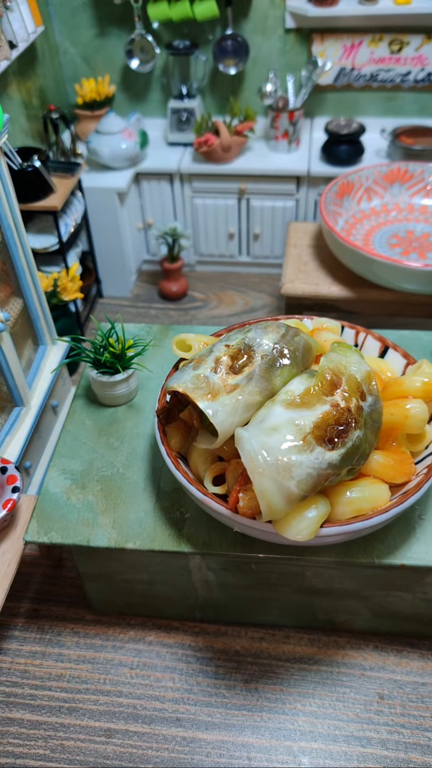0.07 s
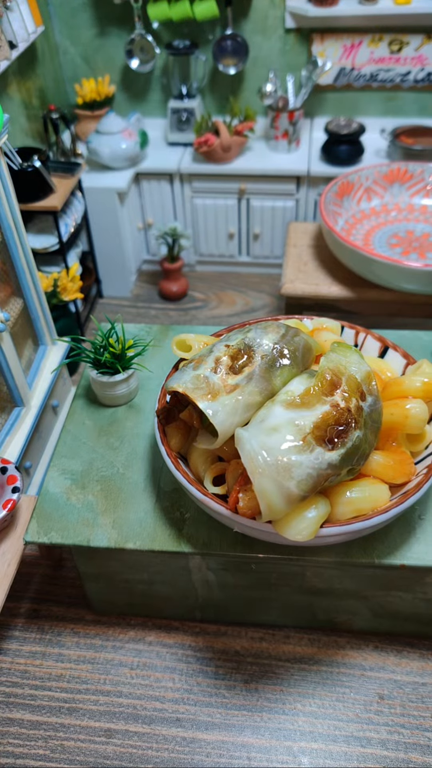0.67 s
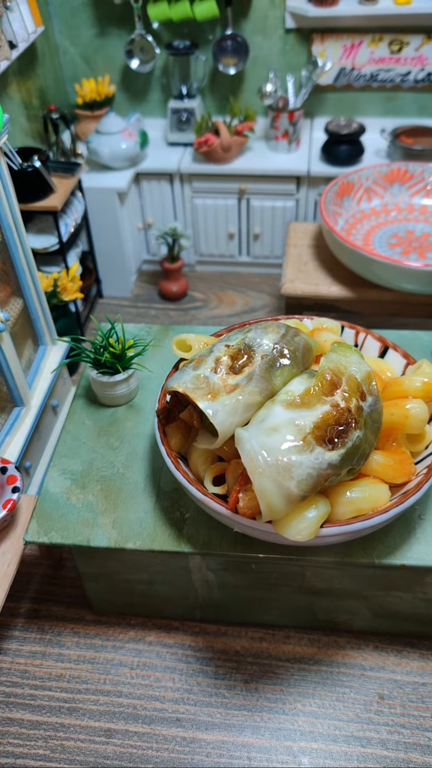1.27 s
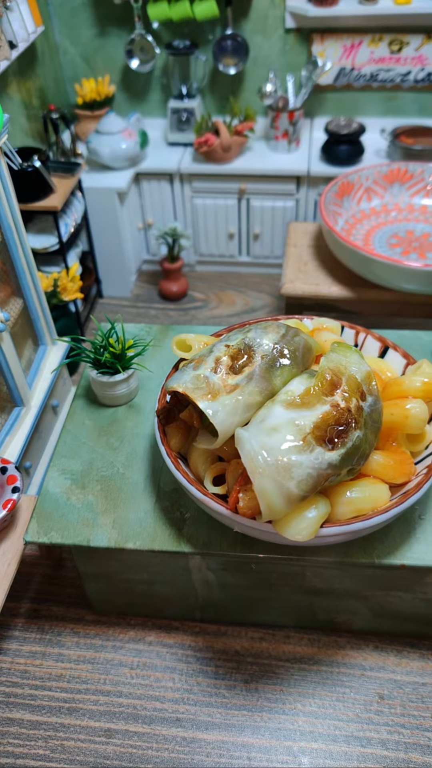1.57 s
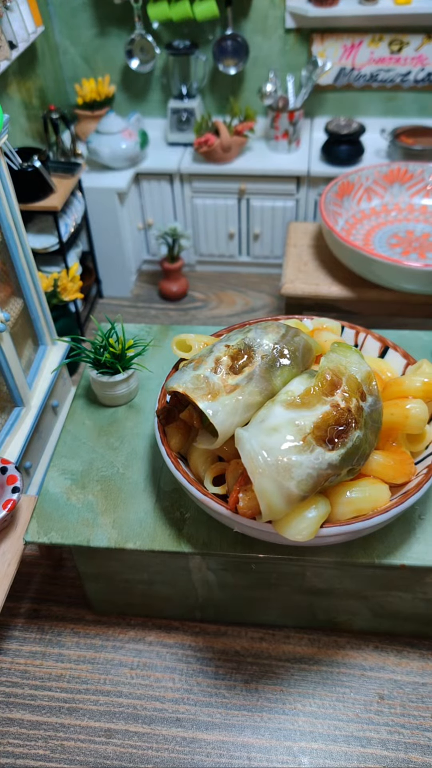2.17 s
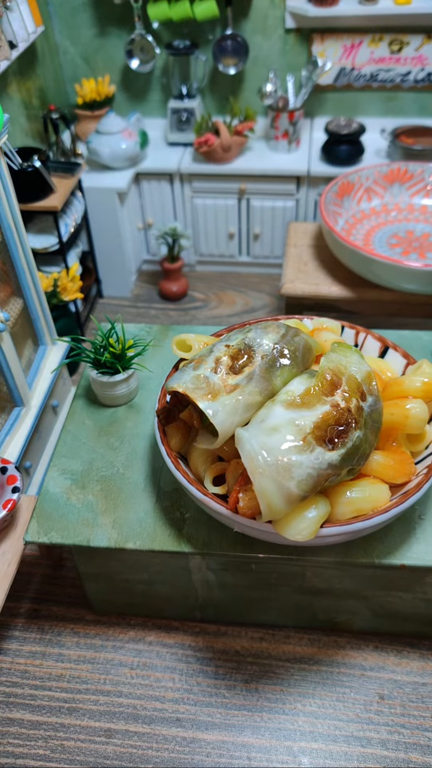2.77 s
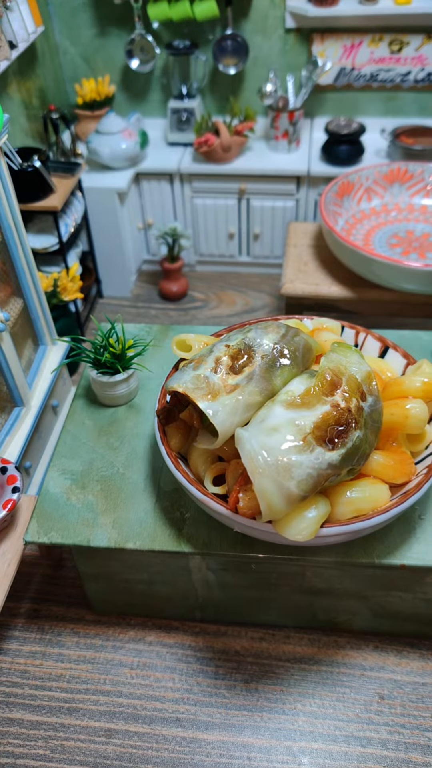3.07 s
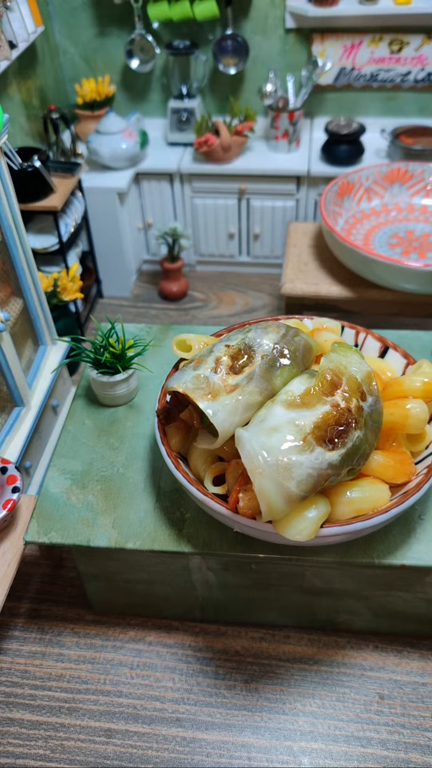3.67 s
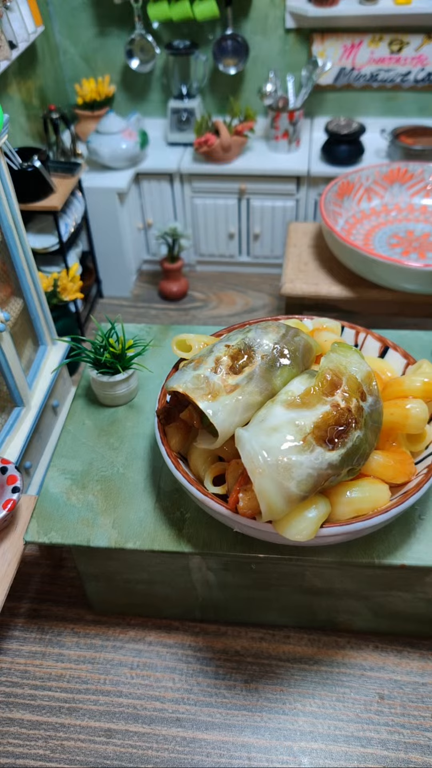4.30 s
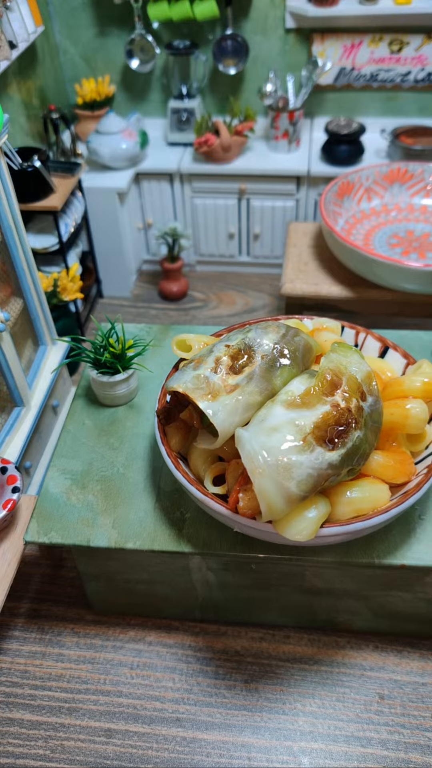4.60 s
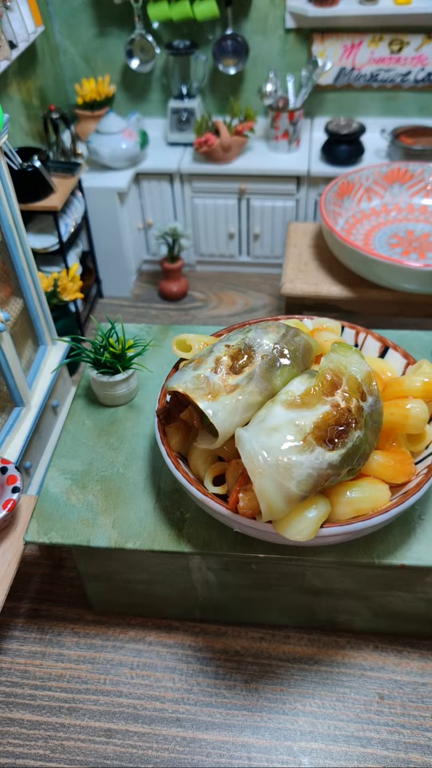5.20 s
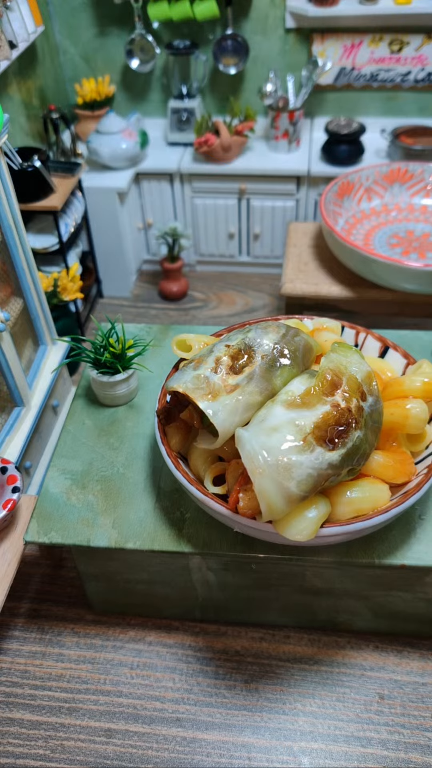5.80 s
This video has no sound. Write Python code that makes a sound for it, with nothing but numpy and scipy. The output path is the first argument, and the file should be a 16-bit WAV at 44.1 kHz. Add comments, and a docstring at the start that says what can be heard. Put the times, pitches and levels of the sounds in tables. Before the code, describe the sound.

A toothpick works sticky food with small wet clicks, tiny dishes tap, and food starts sizzling in a little pan.

```python
"""Miniature cooking on a table

Close by, a toothpick works sticky food with small wet clicks. Tiny dishes tap, ring and skid, and
hollow wooden furniture bumps softly. Halfway a hiss sets in, like food frying in a tiny pan: drops
of fat burst and ring the pan, then the hiss thins into crackles. The room hums low underneath."""
import sys
import numpy as np
from scipy import signal
from scipy.fft import rfft, irfft, next_fast_len
from scipy.io import wavfile
from scipy.ndimage import map_coordinates

SR = 44100
rng = np.random.default_rng(int(sys.argv[2]) if len(sys.argv) > 2 else 0)


def log_audio(samples):
    """Write samples as a 16-bit WAV file to the path given in sys.argv[1]."""
    # one column per channel
    frames = np.atleast_2d(samples).T
    # limit to full scale, then quantise
    limited = np.clip(frames, -1, 1)
    pcm = np.round(limited * 32767).astype(np.int16)
    wavfile.write(sys.argv[1], SR, pcm)


N = 257984
TIME = np.arange(N) / SR  # seconds into the scene
AGE = np.arange(SR // 5) / SR  # seconds into one short sound

# tone of wet food: (frequency [Hz], level [dB])
WET_TONE = [(300, -13), (950, -26), (1520, -3), (2000, -10), (2600, -3.5), (3200, -4), (3800, 4), (4400, 0),
            (5200, -7), (5800, 1.5), (6500, 5.5), (7500, 3.5), (8500, 5.5), (11000, 8), (16000, 8.5)]
# tone of the ringing pan, before tuning: (frequency [Hz], level [dB])
PAN_TONE = [(300, -30), (850, -28.5), (1250, -24), (1540, -8.5), (1980, -19), (2350, -11), (2600, -15.5),
            (2900, -9), (3350, -8), (3930, -1.5), (4500, -10.5), (5850, -7.5), (6350, 4), (6750, 2.5),
            (7120, 5.5), (7750, -10), (16000, -9)]
# the pan's pitch rises, then sinks: (time [s], pitch [ratio])
PAN_TUNING = [(3.1, 0.94), (3.6, 1.0), (4.55, 0.99), (5.1, 0.77)]


def amp(db):
    """Turn decibels into a gain."""
    return 10 ** (np.asarray(db) / 20)


def unit(x):
    """Scale to an average (rms) size of 1."""
    return x / np.sqrt(np.mean(x ** 2) + 1e-20)


def peak_one(x):
    """Scale to a peak of 1."""
    return x / np.max(np.abs(x))


def noise(length=N):
    """An even, white hiss."""
    return rng.standard_normal(length)


def fade(t60):
    """Die away by 60 dB in t60 seconds."""
    return np.exp(-np.log(1000) * AGE / t60)


def note(hz):
    """A pure tone that starts anywhere in its swing."""
    return np.sin(2 * np.pi * (hz * AGE + rng.random()))


def swell(s, width_s):
    """A smooth hill of height 1 around time s."""
    return np.exp(-((TIME - s) / width_s) ** 2)


def wobble(rate):
    """A smooth curve through `rate` random values a second."""
    return map_coordinates(noise(4096), [TIME * rate], mode="wrap")


def add(track, s, sound):
    """Mix a sound in at time s."""
    part = track[max(round(s * SR), 0):][:len(sound)]
    part += sound[:len(part)]


def band(x, lo_hz, hi_hz):
    """Keep the sound between two frequencies."""
    return signal.sosfilt(signal.butter(3, [lo_hz, hi_hz], "band", fs=SR, output="sos"), x)


def colour(x, tone, size=4096):
    """Shape a sound with a tone of (frequency [Hz], level [dB]) points."""
    hz, db = np.transpose(tone)
    gain = amp(np.interp(np.log(np.fft.rfftfreq(size, 1 / SR) + 1), np.log(hz), db))
    fold = 1 + np.sign(size // 2 - np.arange(size))  # keeps the filter from ringing ahead of the sound
    fold[0] = 1
    response = irfft(np.exp(rfft(irfft(np.log(gain)) * fold)))
    return signal.fftconvolve(x, response)[:len(x)]


def gliding(x, tone, tuning, size=512):
    """Shape a sound with a tone whose frequencies are multiplied by a changing tuning."""
    hz, t, spectrum = signal.stft(x, SR, nperseg=size)
    points, db = np.transpose(tone)
    place = np.log((hz[:, None] + 1) / np.interp(t, *np.transpose(tuning)))
    gain = amp(np.interp(place, np.log(points), db))
    return unit(signal.istft(spectrum * gain, SR, nperseg=size)[1][:N])


def patchy(x, depth_db, width_hz, hold_s, size=1024):
    """Make narrow bands of the sound come and go at random."""
    hz, t, spectrum = signal.stft(x, SR, nperseg=size)
    grid = np.meshgrid(hz / width_hz, t / hold_s, indexing="ij")
    patches = map_coordinates(noise((256, 256)), grid, mode="wrap")
    return signal.istft(spectrum * amp(depth_db * patches), SR, nperseg=size)[1][:N]


def crackle(rate, spread_db, t60, bed, rise_s=0.00086):
    """Tiny films burst, about `rate` a second: puffs of many sizes over an even bed of hiss."""
    bursting = rng.random(N) < rate / SR
    sizes = amp(spread_db * np.minimum(noise(), 2))
    puff = fade(t60) * (1 - np.exp(-(AGE / rise_s) ** 2))
    power = np.abs(signal.fftconvolve(bursting * sizes ** 2, puff ** 2)[:N])
    return unit(np.sqrt(power / power.mean() + bed) * noise())


def room(gain_db=2, waver_db=1.02):
    """A low, fuzzy hum wavers over faint air noise."""
    # strength of the hum: (time [s], level [dB])
    loudness = [(0.0, -65.5), (0.4, -64.5), (1.8, -62), (3.0, -63), (4.2, -56), (5.85, -59)]
    # tone of hum and air: (frequency [Hz], level [dB])
    tone = [(20, -77), (35, -40), (55, -19), (105, -10.5), (130, 1.5), (160, -9), (230, -17), (330, -15),
            (450, -20), (800, -30.5), (2000, -31.5), (6000, -32.5), (16000, -45)]
    db = np.interp(TIME, *np.transpose(loudness))
    return amp(db + gain_db + waver_db * wobble(5.2)) * unit(colour(noise(), tone))


def walls(x, echo_db=-17, t60=0.61):
    """Nearby walls add a faint, short echo."""
    tail = noise(len(AGE)) * fade(t60) * (AGE > 0.004)
    return x + amp(echo_db) * signal.fftconvolve(x, tail / np.linalg.norm(tail))[:N]


def rumble():
    """Things pushed over the table make it grumble."""
    # each push: (middle [s], width [s], level [dB])
    pushes = [(.09, 0.11, -56.5), (1.9, 0.03, -55), (2.42, 0.12, -60.5), (4.24, 0.15, -58.5)]
    # tone of the table: (frequency [Hz], level [dB])
    tone = [(40, -21), (90, -1.5), (165, 3.5), (280, -11.5), (420, -11.5), (700, -30), (2000, -57)]
    return sum(amp(db) * swell(s, width_s) for s, width_s, db in pushes) * unit(colour(noise(), tone))


def thuds(rise_s=0.0039, t60=0.076):
    """The table top gives a few slow swings that soon die away."""
    # dull thuds: (time [s], level [dB], pitch [Hz])
    hits = [(0.078, -55, 188), (0.586, -45, 87), (2.477, -49, 374), (2.914, -46, 148), (4.16, -40, 137),
            (4.272, -43, 137)]
    out = np.zeros(N)
    shape = fade(t60) * (1 - np.exp(-AGE / rise_s))
    for s, db, hz in hits:
        add(out, s, amp(db) * peak_one(np.sin(2 * np.pi * hz * AGE) * shape))
    return out


def bumps(swell_s=0.0027, gain_db=2, lead_s=0.00412, note_t60=0.032, scuff_db=-6, scuff_s=0.011):
    """Soft bumps make the hollow furniture ring briefly, with a dull scuff."""
    # each bump: (time [s], level [dB], main note [Hz])
    hits = [(0.52, -57, 455), (0.575, -55, 494), (0.818, -58, 485), (0.879, -55, 492), (1.091, -50, 512),
            (1.53, -44, 484), (1.579, -44.5, 490), (1.673, -52, 517), (1.726, -43, 498), (1.78, -50, 490),
            (1.888, -54, 456), (2.317, -42.5, 490), (2.391, -51.5, 476), (2.564, -47, 485),
            (2.613, -49, 504), (2.911, -48.5, 497), (2.948, -49, 500), (3.004, -46.5, 503),
            (3.93, -48, 490), (4.24, -50, 496), (4.273, -46.5, 511), (4.854, -44, 492), (4.877, -51, 520)]
    # notes of the wood that all bumps share: (pitch [Hz], level [dB], fade time [s])
    wood_notes = [(147.4, -10, 0.09), (305.6, -11.5, 0.077), (358.5, -12.5, 0.19), (577, -9, 0.027),
                  (923, -17, 0.022), (1178, -26, 0.035)]
    out = np.zeros(N)
    push = (AGE / swell_s) ** 2 * np.exp(-AGE / swell_s)
    for s, db, main_hz in hits:
        wood = np.zeros(len(AGE))
        for hz, level, t60 in [*wood_notes, (main_hz, 0, note_t60)]:
            shape = peak_one(signal.fftconvolve(push, fade(t60))[:len(AGE)])
            wood += amp(level) * shape * note(hz)
        scuff = peak_one(band(AGE * np.exp(-AGE / scuff_s) * noise(len(AGE)), 245, 630))
        add(out, s - lead_s, amp(db + gain_db) * peak_one(wood + amp(scuff_db) * scuff))
    return out


def swishes():
    """Something rubs lightly, twice, with a fine grain."""
    # each rub: (middle [s], level [dB], width [s])
    rubs = [(2.525, -55.5, 0.056), (2.935, -55, 0.058)]
    # tone of rubbing: (frequency [Hz], level [dB])
    tone = [(1000, -16), (2700, -2.5), (5000, -5), (6800, 6), (8300, 9), (9800, -6), (16000, -28)]
    grain = crackle(rate=250, spread_db=3, t60=0.02, bed=0.3)
    return sum(amp(db) * swell(s, width_s) for s, db, width_s in rubs) * unit(colour(grain, tone))


def scrapes():
    """A dish slides briefly, with a dry rasp."""
    # each slide: (middle [s], width [s], level [dB], pitch [ratio])
    slides = [(2.484, 0.013, -56, 0.33), (4.226, 0.061, -38, 0.89)]
    # tone of the rasp at pitch 1: (frequency [Hz], level [dB])
    tone = [(1000, -21), (2700, -14.5), (3700, -2), (5600, -2.5), (6600, 4), (9000, -9)]
    out = np.zeros(N)
    for s, width_s, db, pitch in slides:
        rasp = colour(noise(), [(hz * pitch, level) for hz, level in tone])
        out += amp(db) * swell(s, width_s) * unit(rasp)
    return out


def skid(start_s=1.279, db=-37, t60=0.4):
    """After its first tap, the dish's foot grates on and comes to rest."""
    # tone of grating: (frequency [Hz], level [dB])
    tone = [(350, -12), (600, -10), (943, -22), (1590, -4.5), (2670, -14), (4360, -0.5), (5430, -4),
            (9650, 0), (15800, -1.5)]
    grit = crackle(rate=400, spread_db=4, t60=0.012, bed=0.5)
    shape = amp(db - 60 * np.abs(TIME - start_s) / t60) * (TIME > start_s)
    return shape * unit(colour(grit, tone))


def taps(lag_s=0.00051, chatter_db=-23, rattle_db=-13, knock_db=2, thump_hz=328, table_gain_db=3):
    """A dish cracks down on the pan, chatters as it rings and knocks the table under it."""
    # each tap: (time [s], level [dB], table thump [dB], length [ratio], ring against crack [dB])
    hits = [(1.2755, -21.5, -61, 1.0, -15), (3.3592, -24.5, -66, 0.69, -1), (3.4512, -8.5, -35.5, 0.79, -4),
            (4.154, -25, -48.5, 3.3, -6)]
    # notes of the dish: (pitch [Hz], level [dB], fade time at length 1 [s])
    dish_notes = [(1544, 17, 0.028), (2270, -4, 0.073), (2890, -25, 0.04), (3220, -18, 0.015),
                  (3820, 31, 0.011), (4120, 8.5, 0.051), (4100, 0, 0.015), (4896, 3, 0.094),
                  (6460, -5, 0.088), (6500, 13, 0.057), (7300, -22, .025)]
    # tone of the hard contact: (frequency [Hz], level [dB])
    crack_tone = [(30, -60), (150, -24), (300, -4), (540, -10), (900, -13), (1200, -7.5), (1500, 5),
                  (2000, -5), (2550, 6.5), (3900, 4), (5000, 3.5), (6600, -4), (8000, 0), (16000, -18.5)]
    out = np.zeros(N)
    for s, db, thump_db, length, ring_db in hits:
        ring = sum(amp(level + rng.normal(0, 0.53)) * fade(t60 * length) * note(hz)
                   for hz, level, t60 in dish_notes)
        contacts = (AGE == 0) + amp(chatter_db) * noise(len(AGE)) * fade(0.059 * length)
        ring = peak_one(signal.fftconvolve(ring, contacts)[:len(AGE)])
        grit = colour(noise(len(AGE)), crack_tone)
        crack = peak_one(grit * (fade(0.01 * length) + amp(rattle_db) * fade(0.13 * length)))
        knock = peak_one(band(noise(len(AGE)) * fade(0.095), 220, 860))
        table = peak_one(np.sin(2 * np.pi * thump_hz * AGE) * fade(0.14) + amp(knock_db) * knock)
        dish = amp(ring_db) * ring + crack
        add(out, s + lag_s, amp(db) * dish + amp(thump_db + table_gain_db) * table)
    return out


def smear(gain_db=1, resting_db=-60.5, fade_in_s=0.33, rise_s=0.025, relax_s=0.026):
    """Sticky food parts in clumps of faint ticks; each stroke rises, holds and relaxes."""
    # strokes of the toothpick: (start [s], length [s], level [dB])
    strokes = [(0.4, 0.6, -53.5), (1.155, 0.022, -52.5), (1.37, 0.47, -54), (1.873, 0.12, -63),
               (2.227, 0.029, -55), (2.374, 0.06, -63), (2.704, 0.14, -62)]
    effort = amp(resting_db) * np.minimum(TIME / fade_in_s, 1)  # the food's own faint ticking
    for s, length, db in strokes:
        rise = 1 - np.exp(-np.maximum(TIME - s, 0) / rise_s)
        relax = np.exp(-np.maximum(TIME - s - length, 0) / relax_s)
        effort += amp(db) * rise * relax
    ticks = crackle(rate=200, spread_db=3.2, t60=0.014, bed=0.12)
    ticks = patchy(ticks, depth_db=2, width_hz=717, hold_s=0.03)
    return amp(gain_db) * effort * unit(colour(ticks, WET_TONE))


def scratches():
    """The toothpick's tip catches and slips on the glaze, each time a brief, high hiss."""
    # each slip: (middle [s], level [dB], pitch [Hz], width [s], band width [Hz])
    slips = [(0.445, -51.5, 3650, 0.006, 1400), (0.628, -49, 6740, 0.0061, 1700),
             (0.816, -40, 6000, 0.0054, 2400), (1.418, -36, 6800, 0.0038, 2390),
             (5.2612, -18, 7300, 0.001, 3600)]
    return sum(amp(db) * swell(s, width_s) * unit(band(noise(), hz - span / 2, hz + span / 2))
               for s, db, hz, width_s, span in slips)


def clicks(early_s=0.01, lag_s=0.0018, rise_s=0.0005, lead_in_s=0.003, lead_in_share=0.17, tint_db=1.8):
    """A faint lead-in swells into a sharp wet click with a short tail, each in its own tone."""
    # the loudest sticky clicks and crackles: (time [s], level [dB], brightness [dB])
    hits = [(0.063, -52, -11), (0.0784, -45.5, 6), (0.119, -48.5, 11.5), (0.1626, -37.5, 0.5),
            (0.2402, -36.5, 3.5), (0.367, -45, -8), (0.385, -47, 9.5), (0.4247, -47, -4), (0.4386, -41, 4),
            (0.444, -37.5, 3.5), (0.458, -40, -2), (0.508, -55, 4), (0.535, -36.5, -4), (0.5406, -37, 8),
            (0.558, -52, 11), (0.598, -39.5, 0), (0.63, -34, -1), (0.643, -35, -4), (0.648, -38, 5),
            (0.6853, -38.5, 2), (0.6998, -30, -4), (0.744, -36, 1), (0.7766, -37, 3.5),
            (0.809, -36.5, -1.5), (0.846, -35.5, 4.5), (0.854, -41, 10), (0.87, -43, 8), (0.91, -48, 11),
            (0.938, -40, 6), (0.944, -45, 6), (0.957, -39.5, 4), (1.164, -42, 3), (1.198, -42.5, 4),
            (1.2218, -44, 9), (1.246, -45, 5), (1.2742, -23.5, -4), (1.281, -26, 2), (1.373, -30, 0),
            (1.4161, -29, 1), (1.429, -29, 2), (1.4622, -30, 2.5), (1.487, -32, 1), (1.518, -30, 4),
            (1.536, -38, 8), (1.574, -46.5, 13), (1.6202, -28, 2.5), (1.6385, -34.5, 5), (1.68, -43, 8),
            (1.717, -35.5, 7), (1.7316, -32, 4), (1.7932, -33.5, 4), (1.803, -31.5, 0), (1.8427, -46, 9),
            (1.8885, -48, 10), (1.9254, -40, 7.5), (1.9644, -40, 6), (2.023, -38, -1.5), (2.061, -51, 12),
            (2.0732, -35.5, 4), (2.168, -42, -1), (2.268, -41.5, 3), (2.272, -42, 2), (2.3096, -45, 1.5),
            (2.3754, -29.5, 3.5), (2.447, -48, 6), (2.521, -38, 3), (2.672, -50, 6), (2.7128, -28.5, 2.5),
            (2.829, -26.5, -4), (2.848, -32.5, 2.5), (2.8733, -37, -3), (3.0066, -33, -6), (3.0884, -36, 9),
            (3.5545, -21, 2), (4.3032, -21.5, 3.5), (4.602, -23, 2), (4.764, -26, -1), (4.8018, -22.5, 4),
            (4.8043, -21.5, -2), (4.8496, -25, 2), (4.8722, -22.5, 6), (4.8935, -25, 4), (4.957, -27, -2.5),
            (5.1278, -37, 5), (5.1417, -22.5, 3), (5.236, -27.5, 4.5), (5.2594, -20, -5),
            (5.3185, -27.5, 4), (5.3534, -37, 2), (5.362, -31, 2.5), (5.425, -24.5, 5.5), (5.473, -29.5, 5),
            (5.4939, -23.5, -5), (5.518, -22.5, 3), (5.564, -35, 2), (5.614, -21, 5), (5.6827, -29, 6),
            (5.771, -33, 8)]
    out = np.zeros(N)
    decay = amp(-6) * fade(0.0065) + amp(-11) * fade(0.036) + amp(-29) * fade(0.29)  # click, ring, tail
    before = np.minimum(AGE - early_s, 0)
    attack = (1 - lead_in_share) * np.exp(before / rise_s) + lead_in_share * np.exp(before / lead_in_s)
    shape = np.interp(AGE - early_s, AGE, decay) * attack
    for s, db, bright_db in hits:
        wet = colour(noise(len(AGE)), [(hz, level + rng.normal(0, tint_db)) for hz, level in WET_TONE])
        body = amp(-8.5 - bright_db) * unit(band(wet, 760, 4800))
        middle = amp(-1) * unit(band(wet, 5100, 8580))
        sheen = amp(1.4 + bright_db) * unit(band(wet, 8400, 21600))
        add(out, s + lag_s - early_s, amp(db) * shape * (body + middle + sheen))
    return out


def spitting(rise_s=0.00046, t60=0.015, spray_db=-3):
    """Drops of fat burst, ring the pan and throw a little spray."""
    # each drop: (time [s], level [dB])
    drops = [(3.596, -21.5), (3.7529, -22), (3.8335, -26), (3.9002, -25), (3.9439, -22), (3.968, -22.5),
             (4.011, -27), (4.061, -25.5), (4.09, -28), (4.147, -22), (4.435, -20.5), (4.55, -22),
             (4.556, -23.5)]
    force = sum(amp(db - 60 * np.maximum(TIME - s, 0) / t60) * np.exp(np.minimum(TIME - s, 0) / rise_s)
                for s, db in drops)
    hiss = noise()
    spray = amp(spray_db) * unit(colour(hiss, WET_TONE))
    return force * unit(gliding(hiss, PAN_TONE, PAN_TUNING) + spray)


def frying_strength(full_db=-34.5, simmer_db=-46, sputter_db=-40.5, sputter_s=0.092):
    """How hard the food fries, as a gain: it sputters, swells, holds, then sinks to a simmer."""
    # the frying flares and slackens: (middle [s], width [s], level change [dB])
    surges = [(3.65, 0.14, -0.1), (3.83, 0.17, -2), (4.04, 0.077, 2), (4.26, 0.061, -3), (5.33, 0.075, 6)]
    start_s, catch_s, full_s, ease_s = 3.086, 3.19, 3.425, 4.3
    rise_db_per_s, fall_db_per_s = 45, 10
    db = full_db - rise_db_per_s * np.maximum(full_s - TIME, 0)
    db -= fall_db_per_s * np.maximum(TIME - ease_s, 0)
    db += sum(lift * swell(s, width_s) for s, width_s, lift in surges)
    steady = np.hypot(amp(db), amp(simmer_db))
    caught = np.interp(TIME, [start_s, catch_s], [0, 1]) * np.interp(TIME - catch_s, [0, 0.025], [0.3, 1])
    progress = np.clip((TIME - start_s) / sputter_s, 0, 1)
    sputter = amp(sputter_db) * 2 * np.sqrt(progress * (1 - progress))
    return np.hypot(steady * caught, sputter)


def frying(spray_db=2, whistle_db=-10, grit_db=4, dry_from_s=4.52, dry_to_s=4.95):
    """Fine spray hisses while larger bursts ring the pan; then it all thins to a dry crackle."""
    # tone of the spray: (frequency [Hz], level [dB])
    spray_tone = [(1000, -26), (4500, -19), (5900, -19.5), (7100, 2), (7800, -7), (8250, 5), (8900, -3),
                  (9500, -3), (10900, -6), (11900, 2), (14000, 1.5), (16000, -1.5)]
    # path of the highest ringing: (time [s], pitch [Hz])
    whistle_path = [(3.1, 9600), (3.7, 10200), (4.15, 10400), (4.42, 9300), (5.85, 9000)]
    # peak around that pitch: (frequency [ratio], level [dB])
    whistle_tone = [(0.65, -60), (0.91, -12), (0.97, 0), (1.03, 0), (1.08, -13), (2, -60)]
    # tone of the last, dry crackle: (frequency [Hz], level [dB])
    dry_tone = [(300, -20), (1000, -26), (1500, -15.5), (2000, -17), (3000, -9.5), (3500, -10.5),
                (4000, -8.5), (5000, -5), (5600, 2), (6900, 2.5), (7700, -2.5), (8200, 1), (9400, 2.5),
                (10000, -5), (11200, -0.5), (12400, 2.5), (16000, -1.5)]
    bubbles = crackle(rate=900, spread_db=2.5, t60=0.012, bed=0.4)
    pops = crackle(rate=150, spread_db=4.5, t60=0.011, bed=0.008)
    fizz = unit(bubbles + amp(-8) * pops) * amp(0.5 * wobble(40))
    bursts = crackle(rate=110, spread_db=2.2, t60=0.028, bed=0.22)
    pan = patchy(gliding(bursts, PAN_TONE, PAN_TUNING), depth_db=2.2, width_hz=200, hold_s=0.025)
    whistle = patchy(gliding(fizz, whistle_tone, whistle_path), depth_db=2.8, width_hz=220, hold_s=0.04)
    spray = patchy(colour(fizz, spray_tone), depth_db=1.7, width_hz=200, hold_s=0.05)
    hiss = unit(pan) + amp(spray_db) * unit(spray) + amp(whistle_db) * unit(whistle)
    grit = crackle(rate=450, spread_db=3.4, t60=0.011, bed=0.28) * amp(1.4 * wobble(30))
    grit = unit(patchy(colour(grit, dry_tone), depth_db=3.3, width_hz=300, hold_s=0.03))
    dryness = np.interp(TIME, [dry_from_s, dry_to_s], [0, 1])
    return frying_strength() * (np.sqrt(1 - dryness) * hiss + np.sqrt(dryness) * amp(grit_db) * grit)


def scene():
    """Handling, frying and the room at one microphone."""
    contacts = walls(clicks() + scratches() + spitting() + taps() + bumps() + thuds())
    return (contacts + smear() + skid() + scrapes() + rumble() + swishes() + frying() + room())[None]


def record(dry):
    """Cut away the very highest treble."""
    top_hz = 15800
    size = next_fast_len(N + SR // 2)
    return irfft(rfft(dry, size) * (np.fft.rfftfreq(size, 1 / SR) < top_hz), size)[:, :N]


dry = scene()
out = record(dry)
log_audio(out)
```